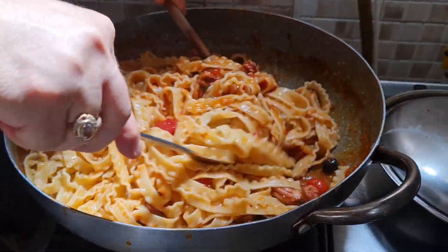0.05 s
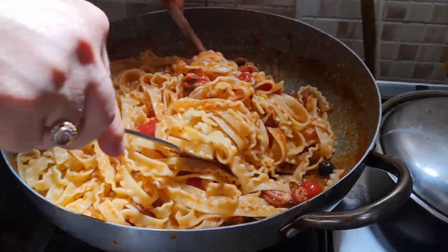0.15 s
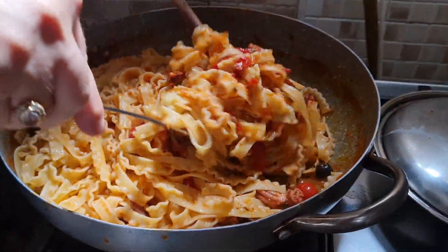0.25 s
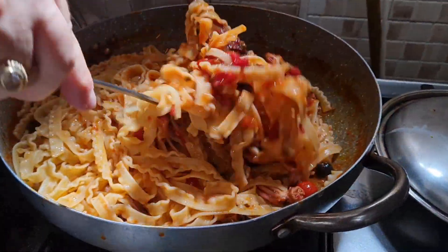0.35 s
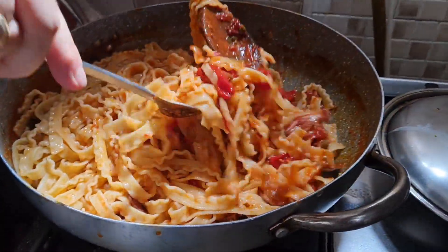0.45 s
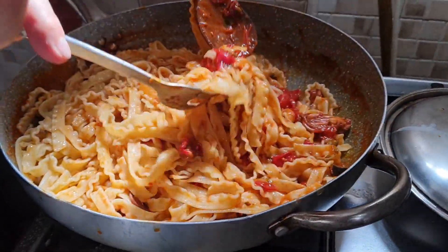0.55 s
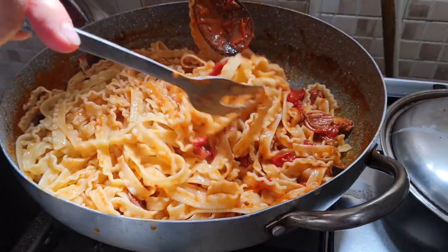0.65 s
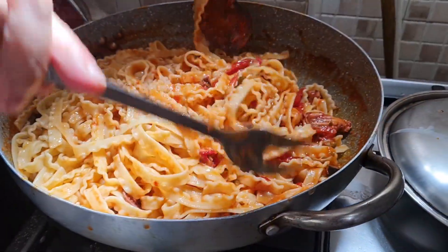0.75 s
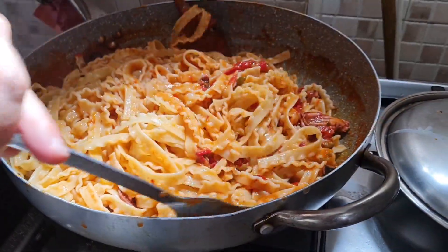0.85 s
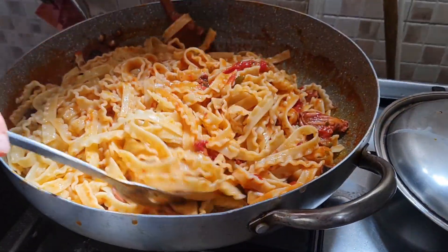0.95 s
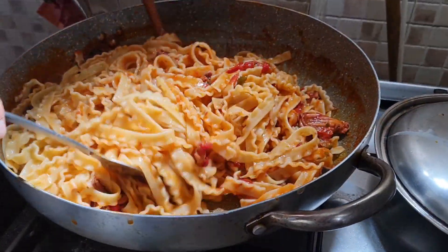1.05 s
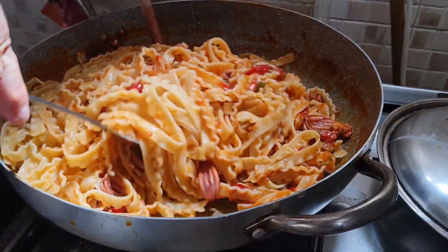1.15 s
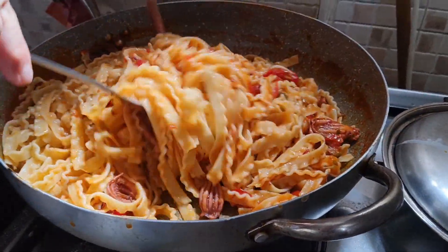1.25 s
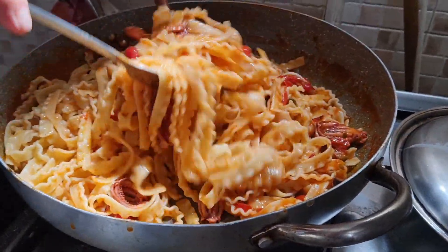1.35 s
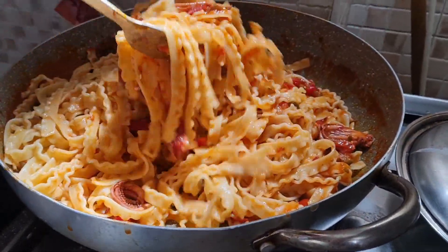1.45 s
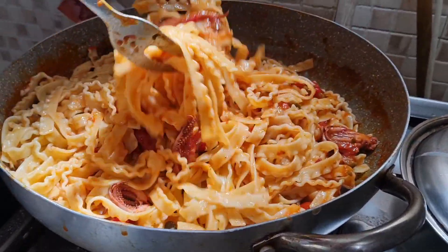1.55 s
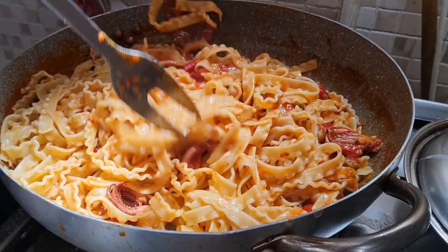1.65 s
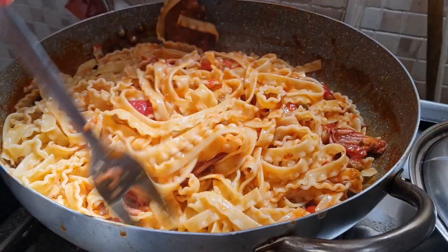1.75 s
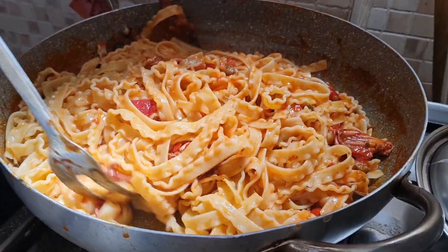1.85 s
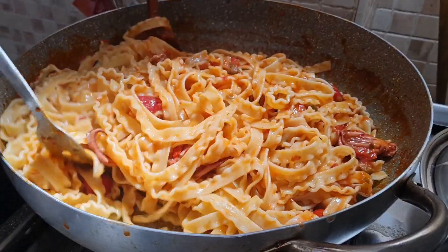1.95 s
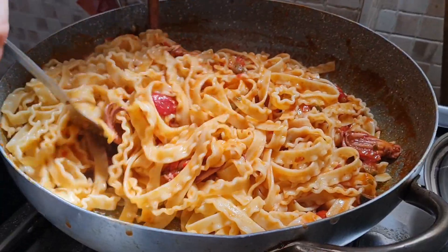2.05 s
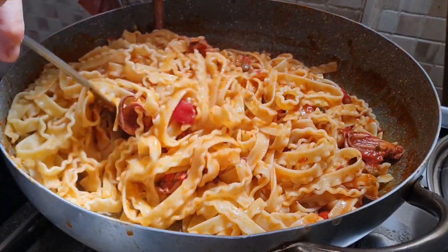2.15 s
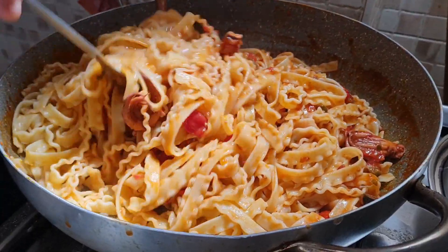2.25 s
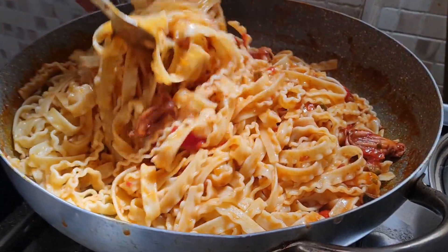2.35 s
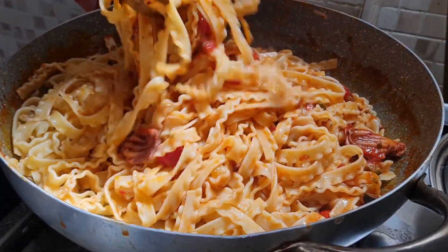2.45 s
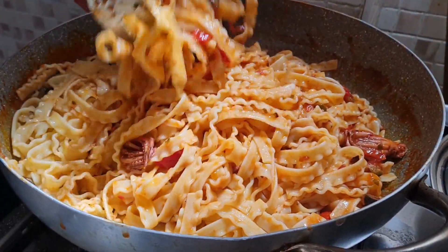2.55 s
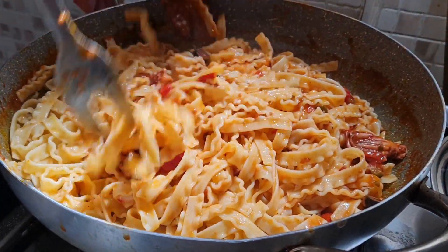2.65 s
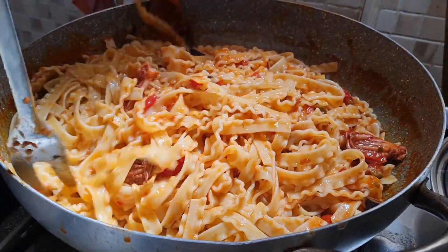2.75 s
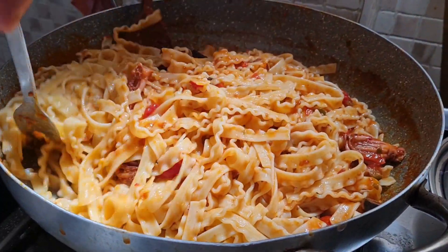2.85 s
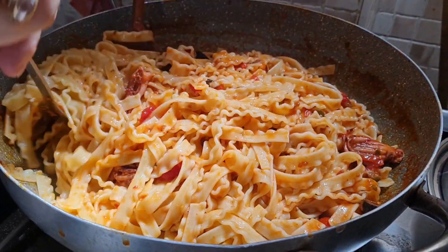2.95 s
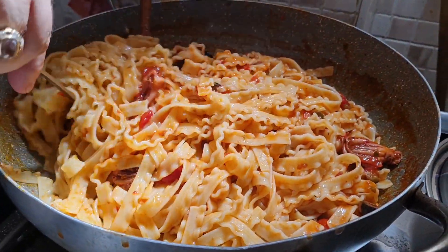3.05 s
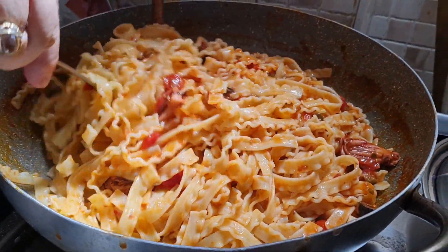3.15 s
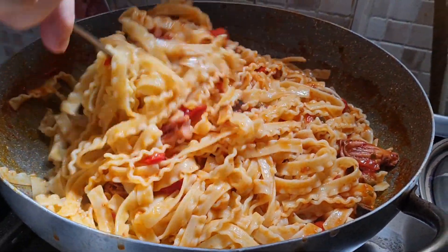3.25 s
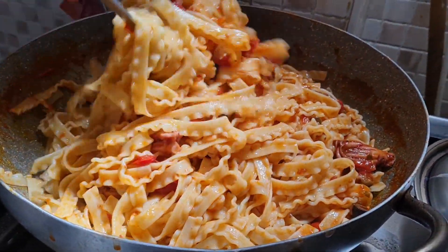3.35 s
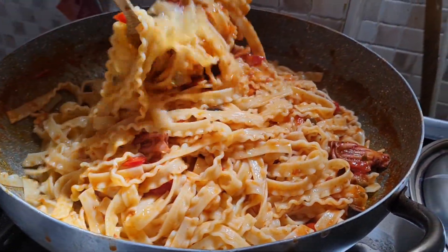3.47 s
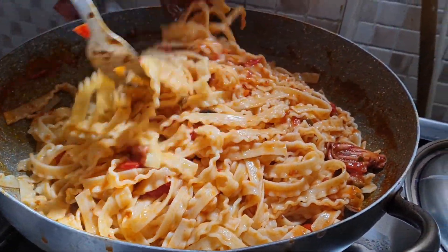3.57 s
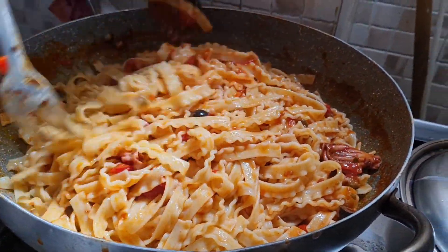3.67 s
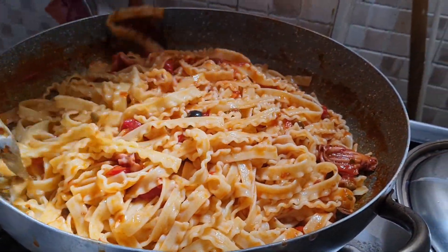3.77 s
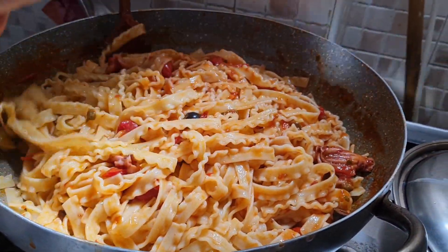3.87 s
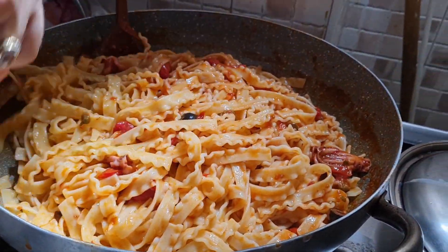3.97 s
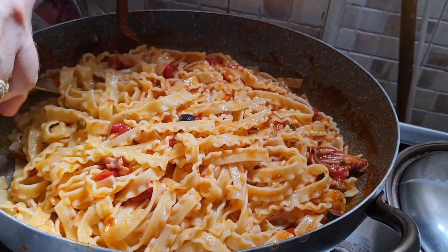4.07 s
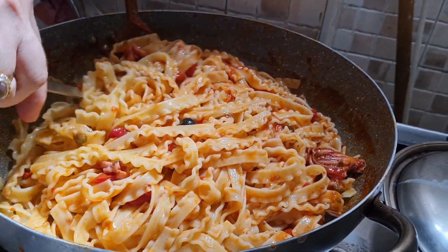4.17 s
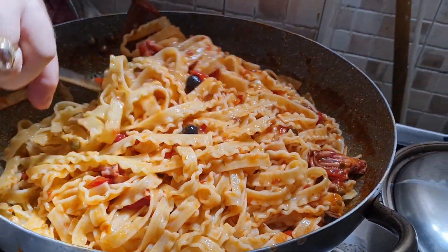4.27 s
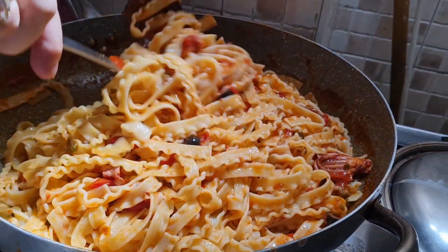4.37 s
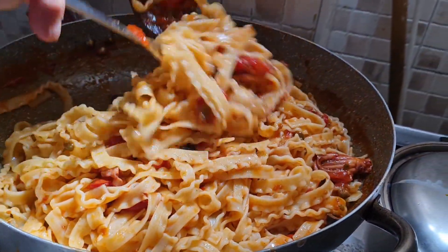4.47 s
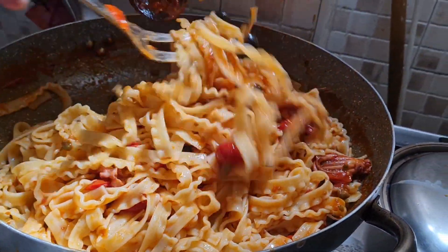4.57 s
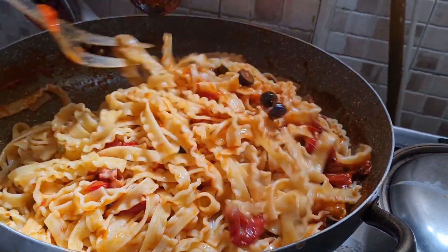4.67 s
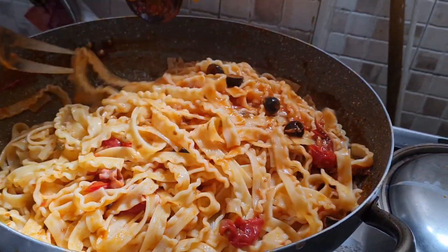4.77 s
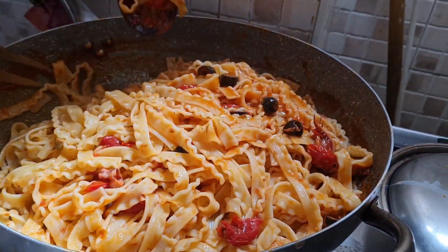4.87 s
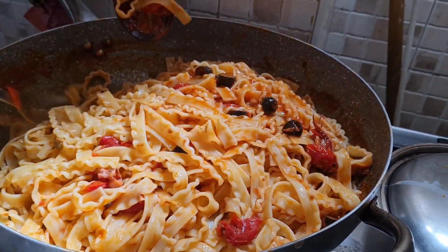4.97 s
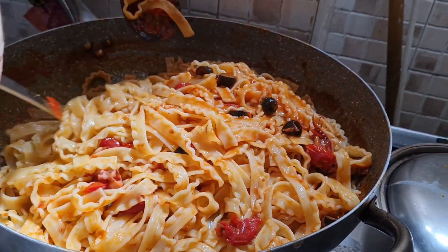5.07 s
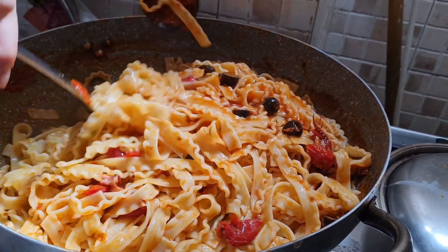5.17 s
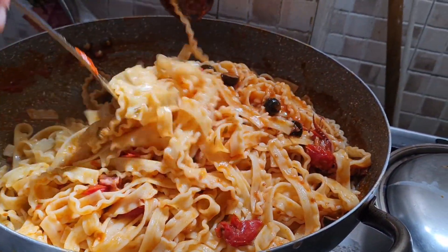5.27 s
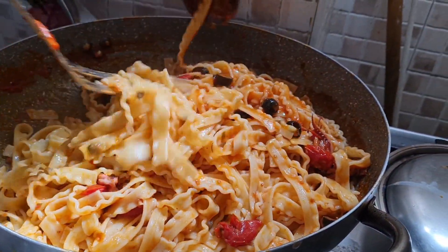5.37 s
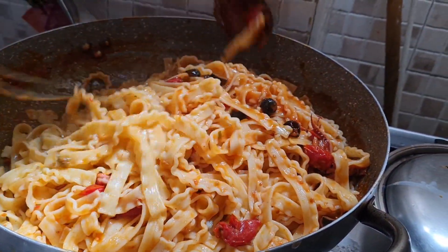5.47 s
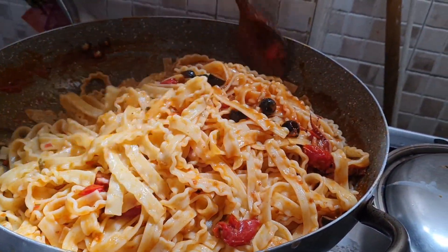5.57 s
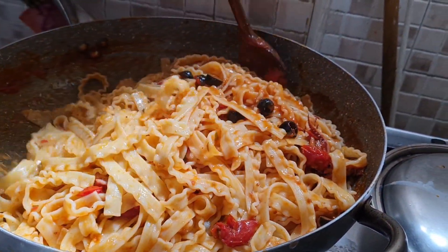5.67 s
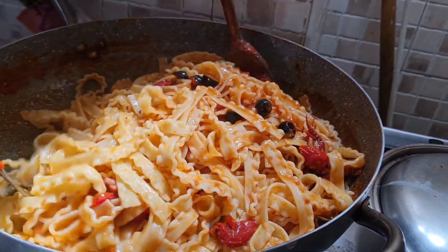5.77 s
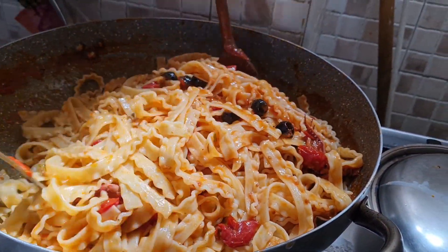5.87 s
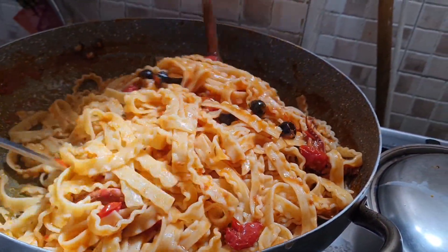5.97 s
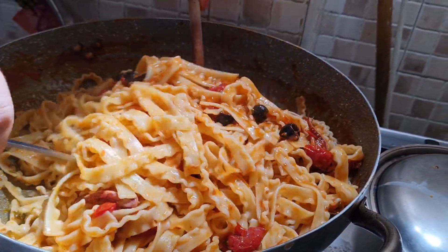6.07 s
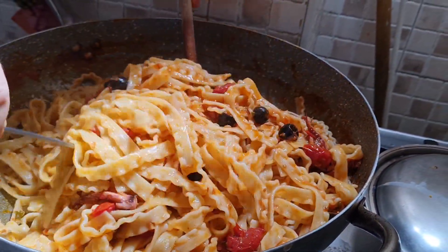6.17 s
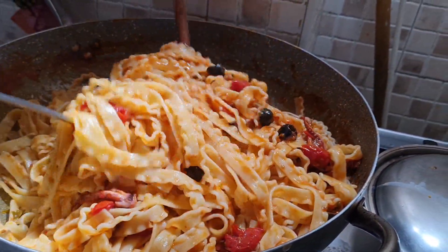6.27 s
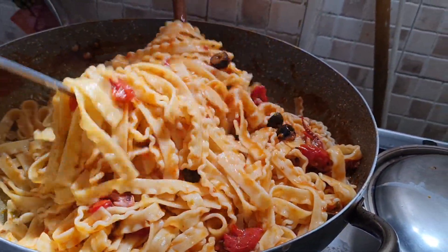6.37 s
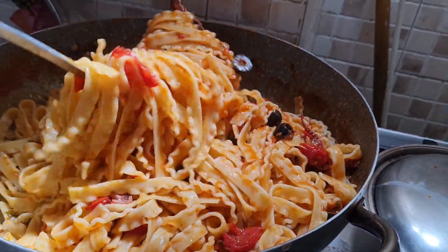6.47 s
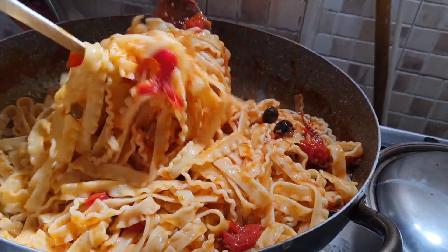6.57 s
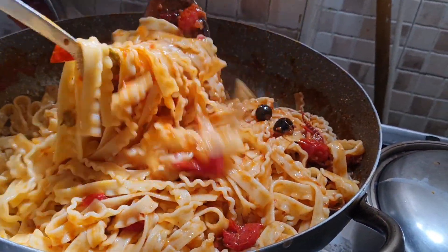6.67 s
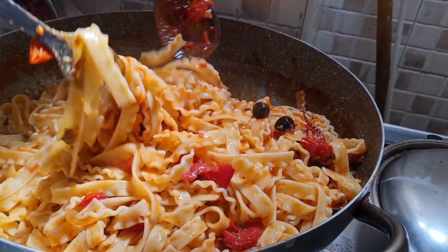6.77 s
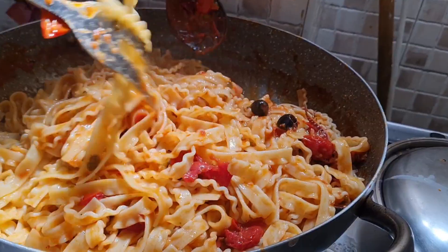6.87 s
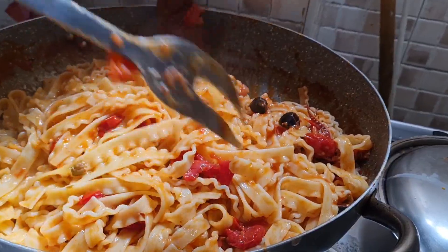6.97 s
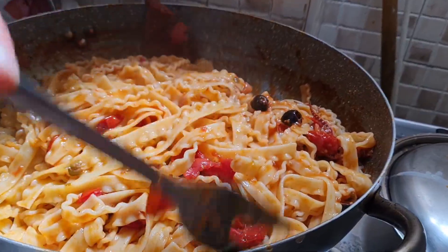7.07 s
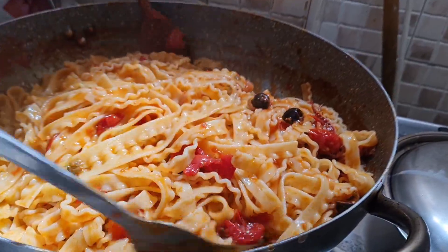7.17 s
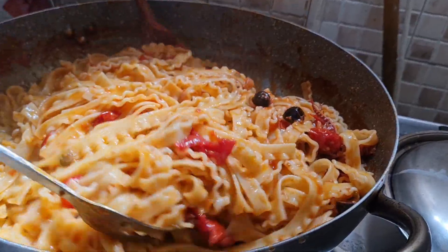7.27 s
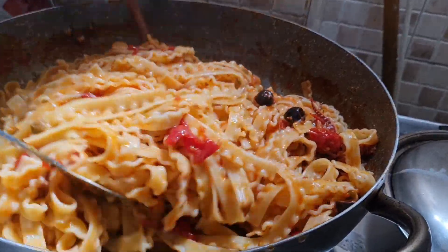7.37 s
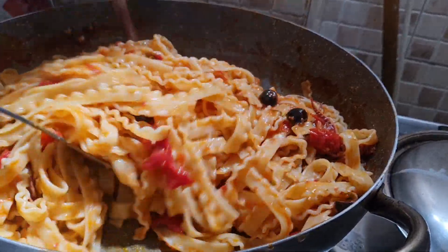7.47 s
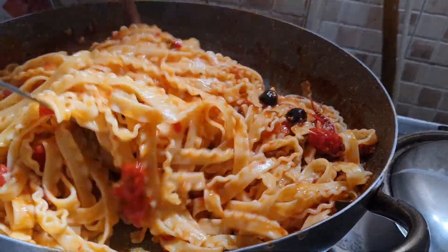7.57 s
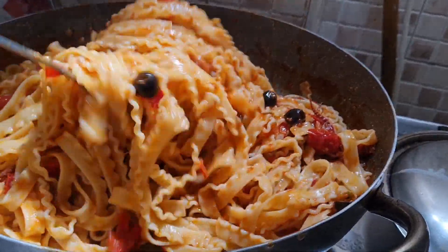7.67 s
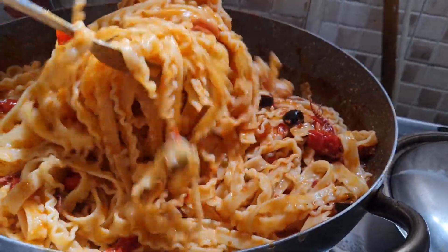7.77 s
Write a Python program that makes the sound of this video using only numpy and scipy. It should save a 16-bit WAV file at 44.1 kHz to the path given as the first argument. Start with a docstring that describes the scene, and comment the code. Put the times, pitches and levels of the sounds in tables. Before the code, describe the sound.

A small tiled kitchen, heard close and in stereo, with a low wavering motor hum, soft room air and faint hiss throughout. At 0 s a brief light fork scrape fades, then wet noodle smacks and small ticks come around 0.5. A double clank of fork on food-damped pan at 0.85 leads to squeaky, gritty drags until 1.15, with a loud wet smack at 1.25. Another clank and rasp fall at 1.8 to 2.1; noodles pop near 2.45. The heaviest, boomiest clank, with grate rattle, hits at 2.78, then scrapes. More clanks come at 3.8, with a longer drag and dull bump near 4.15, at 4.9, with a squeak at 5.05, and doubled at 5.6, with scrapes to 6.1. Mostly soft, sticky noodle sounds follow until a clank at 7.1, short scrapes at 7.2 to 7.45, and clear wet smacks around 7.5 to 7.6.

```python
"""Tossing pasta in a metal pan

A steel fork tosses sauced pasta in a wide pan on a stove in a small kitchen, close to two microphones.
Each plunge clanks: grainy contact noise and damped modes of pan and grate, then squeaks, as swelling tones.
The drags are gritty scrapes: noise through resonances of pan and tines, shaped by the hand's pressure.
Lifted noodles smack softly in clumps of short pops, and pan and falling pasta bump dully.
Behind them a motor hums as wavering low sines, over the soft noise of the room."""
import sys
import numpy as np
from scipy import signal
from scipy.fft import rfft, irfft, next_fast_len
from scipy.io import wavfile
from scipy.ndimage import uniform_filter1d, map_coordinates

SR = 44100
rng = np.random.default_rng(int(sys.argv[2]) if len(sys.argv) > 2 else 0)


def materialize(psi):
    """Save the field psi as 16-bit PCM at rate SR to the path in sys.argv[1].

    A 1-D psi becomes a single channel; in a 2-D psi each row is a channel.
    """
    bounded = np.clip(np.atleast_2d(psi).T, -1, 1)
    quanta = np.round(bounded * 32767).astype(np.int16)
    wavfile.write(sys.argv[1], SR, quanta)


N = 345303


def amp(db):
    """Decibels to gain."""
    return 10 ** (np.asarray(db) / 20)


def unit(x):
    """Scale to rms 1."""
    return x / np.sqrt(np.mean(x ** 2) + 1e-20)


def along(points, hz):
    """Interpolate (f/Hz, value) points on a log frequency axis."""
    f, v = np.transpose(points)
    return np.interp(np.log(hz + 1), np.log(f + 1), v)


def clock():
    """Time of every sample, in seconds."""
    return np.arange(N) / SR


def over_time(points):
    """Interpolate (t/s, level/dB) points over the whole scene."""
    return np.interp(clock(), *np.transpose(points))


def wobble(rate, size=N):
    """A smooth random curve with rate knots a second."""
    knots = rng.standard_normal(int(size * rate / SR) + 4)
    coarse = np.arange(0, size + 32, 32)
    curve = map_coordinates(knots, [coarse * rate / SR], mode="nearest")
    return np.interp(np.arange(size), coarse, curve)


def filtered(x, response):
    """Apply a response of frequency to x."""
    m = next_fast_len(N + 8192, True)
    return irfft(rfft(x, m) * response(np.fft.rfftfreq(m, 1 / SR)), m)[..., :N]


def add(track, s, sound):
    """Mix a sound into a track at time s."""
    part = track[:, max(round(s * SR), 0):][:, :sound.shape[-1]]
    part += sound[..., :part.shape[1]]


def colour(points):
    """Response of a (f/Hz, level/dB) spectrum."""
    return lambda hz: amp(along(points, hz))


def resonant(modes):
    """Response of (f/Hz, nominal width/Hz, level/dB) resonances, summed."""
    return lambda hz: sum(amp(db) / (1 + ((hz - f) / (0.36 * width)) ** 2) ** 0.56
                          for f, width, db in modes)


LAG_S = 0.0003675  # the pan reaches the right port this much late


def at_ports(t):
    """Time as each microphone port hears it: the right one is late."""
    return t - np.arange(2)[:, None] * LAG_S


# likeness of the two microphone ports: f/Hz, likeness (0-1)
PORT_LIKENESS = [(100, 0.93), (400, 0.33), (1400, 0.59), (2500, 0.21), (6000, 0.027)]


def noise(response, spiky_db=0):
    """Stereo noise of rms 1, late on the right and less alike in the treble; spiky makes it grainy."""
    m = next_fast_len(N, True)
    hz = np.fft.rfftfreq(m, 1 / SR)
    grains = rng.standard_normal((2, N)) * amp(spiky_db * wobble(700))
    shared, own = rfft(grains, m) * response(hz)
    alike = np.clip(along(PORT_LIKENESS, hz), 0, 1)
    late = np.exp(-2j * np.pi * hz * LAG_S)
    right = shared * alike * late + own * np.sqrt(1 - alike ** 2)
    return unit(irfft(np.array([shared, right]), m)[:, :N])


def patches(x, depth_db):
    """Narrow bands come and go; each moment keeps its total over frequency, in each port."""
    z = signal.stft(x, nperseg=1024)[2]
    field = rng.standard_normal(z.shape[1:]) + .5 * rng.standard_normal(z.shape)
    field = uniform_filter1d(field, size=3, axis=1)
    field = uniform_filter1d(field, size=10, axis=2)
    banded = z * amp(depth_db * unit(field))
    before = np.linalg.norm(z, axis=1, keepdims=True)
    banded *= before / (np.linalg.norm(banded, axis=1, keepdims=True) + 1e-20)
    return signal.istft(banded, nperseg=1024)[1][:, :N]


# motor's drone: t/s, level/dB
DRONE_LEVEL = [(0.0, -46), (1.2, -43), (3.49, -42), (3.6, -34), (3.84, -48), (3.9, -38.5), (4.27, -41.5),
               (4.62, -36), (4.73, -53), (4.8, -40.5), (5.37, -39), (5.47, -52), (5.56, -38.5), (6.02, -46),
               (7.54, -40), (7.59, -44), (7.68, -36), (7.83, -46)]
DRONE_HZ, WAVER_DB, WAVER_RATE = 59.8, 1.8, 14  # pitch; depth and knots a second of its wavering
# partials of the motor's hum: f/Hz, level/dB
HUM_PARTIALS = [(118.4, -59), (177.6, -65.5), (253, -66.5), (290.7, -65.5), (376.8, -68)]


def motor():
    """A motor hums unsteadily: sines whose level and phase wander."""
    t = clock()
    level = amp(over_time(DRONE_LEVEL) + WAVER_DB * wobble(WAVER_RATE))
    hum = level * np.sin(2 * np.pi * DRONE_HZ * t + 0.31 * wobble(8.3))
    for hz, db in HUM_PARTIALS:
        hum += amp(db + 2.56 * wobble(4)) * np.sin(2 * np.pi * hz * t + .5 * wobble(3.7))
    return np.sqrt(2) * hum


# soft rush of the room's air: f/Hz, relative level/dB
ROOM_COLOUR = [(20, -14), (45, 9.5), (100, 5.5), (150, -10), (200, 0), (260, -2), (330, -8), (600, -4.5),
               (1000, -7.5), (1500, -13), (2500, -18), (6000, -26.5), (13000, -25.5)]
# faint treble between strokes, the base level for hiss and noodles: t/s, level/dB
TREBLE_LEVEL = [(0.0, -67), (.33, -59), (.55, -67), (.8, -55), (1.7, -56), (4.6, -56), (6.2, -58.5),
                (7.83, -56)]
# colour of the hiss: f/Hz, relative level/dB
HISS_COLOUR = [(5000, -30), (8500, -1), (10500, -1), (11700, 3), (12400, 0), (14500, 2), (16000, -2.5)]
# steady narrow bands in the hiss: f/Hz, nominal width/Hz, relative level/dB
WHINE_BANDS = [(5430, 200, -4), (11720, 200, 1.5)]
HISS_DB, WHINE_DB = 4, -64  # hiss over the treble level; whine


def room():
    """The room's soft rush, a patchy hiss and faint narrow bands, all of filtered noise."""
    rush = amp(-48.0 + 0.9 * wobble(7.3)) * noise(colour(ROOM_COLOUR))
    hiss = amp(over_time(TREBLE_LEVEL) + HISS_DB) * patches(noise(colour(HISS_COLOUR)), depth_db=2.5)
    whine = amp(WHINE_DB) * noise(resonant(WHINE_BANDS))
    return rush + hiss + whine


def slips(rate):
    """Stick and slip: the friction flutters finely as the tines catch and let go."""
    return unit(amp(1.2 * wobble(rate) + .8 * wobble(40)))


def rasp(response):
    """Grainy noise in patches: the wandering contact point favours ever new modes."""
    return patches(noise(response, spiky_db=2.6), depth_db=4.8)


# fork drags over the pan: start t/s, length/s, base level/dB, wall level/dB, tine level/dB,
# grit level/dB, push/dB (before each part's share), place of the push (0-1 of the length)
FORK_DRAGS = [(0.0, 0.059, -52.5, -40.5, -47.5, -39, 0, 0.4),
              (0.909, 0.1, -49, -37, -38.5, -42, 12.5, 0.78),
              (1.029, 0.11, -48, -39.5, -44.5, -46.5, 5.5, 0.66),
              (1.83, 0.091, -41, -30.5, -35.5, -38.5, -1, 0.64),
              (1.941, 0.13, -44, -35.5, -41, -42, 5, 0.6), (2.799, 0.076, -43, -38, -31, -29.5, -1.5, .6),
              (2.922, 0.015, -48.5, -52, -40.5, -35.5, 8, .4),
              (2.955, 0.13, -50.5, -48.5, -44, -43.5, 5, 0.92),
              (3.817, 0.29, -44, -42.5, -37.5, -32, 6, 0.99),
              (4.408, 0.054, -54.5, -51, -55.5, -47, 1, 0.3),
              (4.929, .15, -46.5, -39, -38.5, -36.5, 9, 0.85),
              (5.626, 0.098, -40, -43, -45, -39.5, 10, 0.92), (5.803, 0.037, -45.5, -50, -49.5, -50, 3, .2),
              (5.885, 0.2, -43, -44, -49, -46.5, 11, 0.51), (7.216, 0.037, -39, -40, -39, -42, 3, .5),
              (7.263, 0.077, -47, -38.5, -48, -49, 7, 0.34),
              (7.358, 0.076, -49.5, -38.5, -42.5, -44, 2.5, 0.84)]
# resonances of base, wall and tines with the fork pressed on the pan, and the broad response
# of the food-damped wall: f/Hz, nominal width/Hz, relative level/dB
BASE_MODES = [(616, 50, 6), (633, 250, 6)]
WALL_MODES = [(1076, 28, 1), (1264, 43, 1), (1485, 47, 8.5), (1962, 210, 2), (2180, 140, -26),
              (2390, 230, 4.5)]
TINE_MODES = [(3220, 144, 1.5), (3660, 99, -12), (3890, 260, -1), (4580, 920, -13.5), (5400, 190, -7),
              (6300, 300, -33)]
WALL_BROAD = [(1150, 350, -22), (2700, 850, -16)]
# grit of the contact: f/Hz, relative level/dB
GRIT_COLOUR = [(4000, -36), (6500, 5.5), (9000, 0), (11500, -3.5), (14000, -4), (16000, -3.5)]
# as the fork slides on: level slope of base, wall, tines, grit [dB/s]
SLIDE_SLOPE = (-28, 4, 1, -19)
# how much base, wall, tines, grit feel the push: share (0-1)
PUSH_FELT = (0.088, 0.77, 0.68, 0.28)
BITE_S, LET_GO_S = 0.013, 0.016  # the tines take hold before the start; they leave the metal
PUSH_WIDTH_S = 0.024  # the hand bears down briefly once in each drag
PRESSURE_DB, PRESSURE_RATE = 1.6, 28  # unsteady hand: depth, knots a second


def scrapes():
    """Tiny slips drive base, wall, tines and grit; each drag bites, swells under one push and lets go."""
    t, drive = clock(), np.zeros((4, N))
    for start, length, *levels_db, push_db, place in FORK_DRAGS:
        near = (t > start - .05) & (t < start + length + .2)
        age = t[near] - start
        touching = np.clip(age / BITE_S + 1, 0, 1)
        touching *= np.exp(-np.maximum(age - length, 0) / LET_GO_S)
        push = push_db * np.exp(-((age - place * length) / PUSH_WIDTH_S) ** 2)
        for part, db, slope, share in zip(drive, levels_db, SLIDE_SLOPE, PUSH_FELT):
            part[near] += touching * amp(db + slope * (age - length / 2) + share * push)
    base = noise(resonant(BASE_MODES))
    wall = rasp(resonant(WALL_MODES + WALL_BROAD))
    tines = rasp(resonant(TINE_MODES))
    grit = rasp(colour(GRIT_COLOUR))
    pressure = amp(PRESSURE_DB * wobble(PRESSURE_RATE))
    scraped = sum(d * part for d, part in zip(drive, (base, wall, tines, grit)))
    return slips(rate=450) * pressure * scraped


# wet smacks of the noodles: t/s, level/dB, f/Hz
NOODLE_SMACKS = [(0.0598, -36, 2130), (0.486, -29.5, 4170), (0.53, -44, 3500), (1.2526, -27.5, 1580),
                 (1.504, -39, 3480), (2.393, -42.5, 3120), (2.4686, -31.5, 2010), (2.6375, -40, 3540),
                 (3.4004, -46, 3400), (6.3066, -46, 2540), (6.6029, -45, 2740), (6.6957, -43, 3400),
                 (7.069, -37.5, 3340), (7.4994, -29, 1210), (7.5348, -29.5, 1390), (7.5903, -32.5, 1240)]
# crisp little ticks: t/s, level/dB
CRISP_TICKS = [(.169, -37), (.51, -44), (4.404, -38)]
# the fork lifts a load of noodles: t/s
NOODLE_LIFTS = [.6, 1.35, 2.4, 3.449, 4.5, 5.3, 6.5, 7.65]
# colour of the wet rustle: f/Hz, relative level/dB
WET_COLOUR = [(1200, -57), (2500, -5), (3300, 1), (4400, -2), (5600, 2), (6600, 3), (9000, -18)]
LIFT_SPREAD_S, FAINT_DB, FAINT_HZ = .19, -56.5, 2130  # faint smacks: spread, least level, lowest pitch
RUSTLE_DB = 1.0  # wet noodles over the treble level


def pasta():
    """Sauce films snap between noodles: clear smacks and ticks over many faint ones and a wet rustle."""
    out, t = np.zeros((2, N)), np.arange(int(0.034 * SR)) / SR
    smacks = list(NOODLE_SMACKS)
    for lift in NOODLE_LIFTS:
        for size, pitch in rng.uniform(1e-6, 1, size=(14, 2)):
            s = lift + LIFT_SPREAD_S * rng.normal()
            smacks.append((s, FAINT_DB + 3 * min(-np.log(size), 3), FAINT_HZ * 2.2 ** pitch))
    for s, db, hz in smacks:
        # a film tears in a quick clump of ever weaker pops of scattered pitch
        for k in range(4):
            delay = k * rng.uniform(.001, .003)
            pitch = hz * np.exp(rng.normal(0, .02 + .045 * k))
            envelope = (1 - np.exp(-t / 0.00058)) * amp(-60 * t / 0.012)
            pop = envelope * np.sin(2 * np.pi * pitch * at_ports(t))
            add(out, s + delay, amp(db + 7.5 - 6.9 * k) * pop)
        add(out, s, amp(db - 16 - 60 * t / 0.033) * rng.standard_normal((2, len(t))))
    for s, db in CRISP_TICKS:
        add(out, s, amp(db - 60 * t / 0.03) * rng.standard_normal((2, len(t))))
    sticky = patches(noise(colour(WET_COLOUR), spiky_db=3), depth_db=2.5) * amp(wobble(25))
    return out + amp(over_time(TREBLE_LEVEL) + RUSTLE_DB) * sticky


def swells(rows, rough, flutter_rate):
    """Short swelling tones whose phase is shaken by uneven contact (rough in radians)."""
    out = np.zeros((2, N))
    for s, half, hz, db in rows:
        t = np.arange(-3 * half, 3 * half, 1 / SR)
        phase = 2 * np.pi * hz * at_ports(t) + rough * wobble(flutter_rate, size=len(t))
        add(out, s - 3 * half, amp(db) * np.sqrt(2) * np.exp(-(t / half) ** 2) * np.sin(phase))
    return out


# dull bumps of pan and falling pasta: middle t/s, half length/s, f/Hz, level/dB
DULL_BUMPS = [(.245, 0.034, 123, -46), (.25, 0.034, 245, -47), (1.97, 0.071, 82.4, -41.5),
              (2.97, 0.043, 93.5, -36), (3.93, 0.153, 97.7, -38.5), (4.158, 0.0092, 63.6, -26.5),
              (4.21, 0.0544, 41.4, -38), (7.39, 0.033, 97, -50), (7.6, 0.0073, 294, -44.5)]


def bumps():
    """Pan and falling pasta bump dully: low tones with a slowly shaken phase."""
    return swells(DULL_BUMPS, rough=0.58, flutter_rate=38.4)


def ring(modes, t, attack):
    """Damped modes at fresh strengths; high modes reach the two ports in unrelated phase."""
    out = np.zeros((2, len(t)))
    for k, (hz, db, t60) in enumerate(modes):
        phase = k * np.pi + rng.normal(0, 1, (2, 1)) * min((hz / 2200) ** 2, 2)
        strength_db = db + rng.normal(0, 1.5)
        out += amp(strength_db - 60 * t / t60) * np.sin(2 * np.pi * hz * at_ports(t) + phase)
    return out * (1 - np.exp(-t / attack))


# fork hits the pan: t/s, clash level/dB, base level/dB, wall level/dB, zing level/dB, grit level/dB,
# rock level/dB, grate level/dB, chatter/s
FORK_STRIKES = [(0.841, -19.5, -8, -24, -24.5, -19.5, -45.5, -40.5, 0.022),
                (0.8774, -23, -18, -27.5, -25, -28, -39, -52, 0.011),
                (1.8126, -23.5, -15, -42, -29.5, -12, -36, -39.5, 0.0063),
                (2.761, -34.5, -13, -26.5, -44.5, -41, -31, -46, 0.01),
                (2.777, -21.5, 1.5, -21.5, -24.5, -21.5, -24.5, -25.5, 0.011),
                (3.7938, -17, -4, -22, -19.5, -20, -37, -26.5, 0.0098),
                (4.896, -17.5, -7.5, -32, -16.5, -13, -37.5, -38.5, 0.0097),
                (4.922, -34.5, -29, -31, -42, -24.5, -30.5, -37.5, 0.011),
                (5.5922, -20.5, -8, -22.5, -22.5, -20, -44, -36, 0.0096),
                (5.6088, -23.5, -21, -36, -31, -24, -29, -33.5, 0.0072),
                (7.124, -19, -8.5, -21, -21.5, -22.5, -35, -35, 0.016)]
# contact noises, and the thud of the grate: f/Hz, relative level/dB
CLANK_COLOUR = [(350, -27), (700, -3), (1300, -6), (1600, -2), (2200, -44)]
CLASH_COLOUR = [(900, -32), (1700, -5), (2400, -9.5), (3400, -1.5), (4100, -5), (5200, -42)]
ZING_COLOUR = [(3600, -22), (4600, 2.5), (5600, -0.5), (6500, -2), (7500, -18), (9500, -16)]
THUD_COLOUR = [(90, -26), (150, -5.5), (220, 2.5), (380, -4), (480, -12), (700, -45)]
# modes of the food-damped base, of pan and fork, of the rocking pan and of the pan on its grate:
# f/Hz, relative level/dB, t60/s
BASE_BOOM = [(585.6, 2, 0.058), (629, -8, 0.053), (781, -11, 0.071)]
PAN_RING = [(893, 0, 0.17), (1026, 4, 0.067), (1174, 12.5, 0.04), (1351, 0, 0.18), (1477, 2, 0.1),
            (1968, 2, 0.21), (2090, 2.5, 0.093), (2602, 8, 0.1), (3000, -17, .06), (3340, -18, 0.1),
            (3740, -18.5, .05), (3560, -28, .06), (3700, -11, 0.083), (4400, -16, .04), (5630, 8, 0.058),
            (5410, -16, .05), (5340, -11, 0.038), (5900, -5, .05)]
PAN_ROCK = [(100.6, -0.78, 0.41), (112, -0.49, 0.19)]
GRATE_RING = [(179, -22, 0.26), (222, -7, 0.25), (255.6, -6, 0.25), (287, 0.5, 0.43), (349, 2, 0.09),
              (386.7, 2, 0.29)]
WALL_RING_DB, TINE_RING_DB = -3, -11  # ringing of low and high modes against the contact noise
CONTACT_LEAD_S = 0.0019  # the contact begins this long before it is felt in full


def chatter_noise(points):
    """Grainy, patchy noise of tines chattering on metal."""
    return patches(noise(colour(points), spiky_db=1.5), depth_db=4)


def strikes():
    """The tines chatter on the metal for some milliseconds; base, wall and grate ring on."""
    out, t = np.zeros((2, N)), np.arange(SR // 3) / SR
    clank, clash = chatter_noise(CLANK_COLOUR), chatter_noise(CLASH_COLOUR)
    zing, grit = chatter_noise(ZING_COLOUR), chatter_noise(GRIT_COLOUR)
    thud = noise(colour(THUD_COLOUR))
    low_modes = [mode for mode in PAN_RING if mode[0] < 1700]
    high_modes = [mode for mode in PAN_RING if mode[0] >= 1700]
    for s, clash_db, base_db, wall_db, zing_db, grit_db, rock_db, grate_db, chatter in FORK_STRIKES:
        start = s - CONTACT_LEAD_S
        now = slice(round(start * SR), round(start * SR) + len(t))
        # the pasta cushions the blow, so the contact builds up before it fades
        build = 1 - np.exp(-(t / 0.0026) ** 2)
        contact = build * (np.exp(-(t / chatter) ** 2) + amp(-7 - 60 * t / 0.16))
        metal = amp(wall_db) * clank[:, now] + amp(clash_db) * clash[:, now]
        metal += amp(zing_db) * zing[:, now] + amp(grit_db) * grit[:, now]
        add(out, start, contact * metal)
        # the base is a little stronger at the right port
        blow = amp(base_db + np.array([[-1.5], [1.5]])) * ring(BASE_BOOM, t, attack=0.007)
        blow += amp(wall_db + WALL_RING_DB) * ring(low_modes, t, attack=0.0014)
        blow += amp(clash_db + TINE_RING_DB) * ring(high_modes, t, attack=0.0049)
        # the pan rocks, and the grate below it rattles with a slower onset
        blow += amp(rock_db) * ring(PAN_ROCK, t, attack=0.0042)
        blow += amp(grate_db) * ring(GRATE_RING, t, attack=0.018)
        blow += amp(grate_db - 60 * t / 0.3) * (1 - np.exp(-t / 0.014)) * thud[:, now]
        add(out, s, blow)
    return out


# a tine catches and squeaks: middle t/s, half length/s, f/Hz, level/dB
TINE_SQUEAKS = [(.848, 0.0033, 3400, -18), (.975, 0.012, 1700, -25), (.985, 0.017, 2334, -34),
                (1.818, 0.0057, 3304, -20), (1.889, 0.0077, 3280, -31), (1.908, 0.012, 1990, -26.5),
                (2.02, .008, 1533, -24), (2.05, 0.0089, 3220, -33), (2.842, 0.013, 3360, -29.5),
                (3.73, 0.017, 3330, -50), (4.105, 0.0183, 5330, -35.5), (5.052, 0.023, 1999, -27.5),
                (5.06, 0.023, 4060, -42), (7.375, 0.022, 3330, -41.5), (7.415, .012, 3150, -35),
                (7.415, 0.0093, 2420, -36)]


def squeaks():
    """A catching tine squeaks: brief high tones roughened by a fast phase flutter."""
    return swells(TINE_SQUEAKS, rough=0.85, flutter_rate=334)


# decay of the kitchen: f/Hz, t60/s
KITCHEN_DECAY = [(150, 0.41), (600, 0.23), (3000, 0.25), (12000, 0.18)]


def kitchen(x):
    """Tiled walls answer 4 ms later with a short decaying noise tail, different at each port."""
    hz, t, z = signal.stft(rng.standard_normal((2, SR // 2)), SR, nperseg=256)
    decay = amp(-60 * t / along(KITCHEN_DECAY, hz)[:, None])
    tail = signal.istft(z * decay, SR, nperseg=256)[1]
    tail = unit(tail) / np.sqrt(tail.shape[1])
    tail = np.pad(tail, ((0, 0), (round(.004 * SR), 0)))
    return signal.fftconvolve(x, tail, axes=1)[:, :N]


def scene():
    """Fork, pan and pasta close by, with the answer of the kitchen, its motor and its air."""
    close = scrapes() + pasta() + strikes() + squeaks()
    return motor() + room() + close + bumps() + amp(-9.5) * kitchen(close)


# colour of the left and right microphone ports: f/Hz, level/dB
LEFT_PORT = [(60, -1.5), (280, 0.7), (600, -2), (1400, -.5), (3500, -1), (5200, -4), (6300, -2),
             (7300, -12), (8100, -5), (8900, 3), (10500, 1.2), (15000, -2)]
RIGHT_PORT = [(60, 1.5), (280, 1.5), (600, -1.5), (1400, -1), (3500, 0.5), (5500, 2.5), (6500, -5.5),
              (7300, -12), (8300, -7), (10000, -2), (13000, 2.5), (15000, 1.5)]
TOP_HZ = 15950  # band limit


def record(dry):
    """Each port has its own colour, with a notch in the treble; nothing passes the band limit."""
    return filtered(dry, lambda hz: amp([along(LEFT_PORT, hz), along(RIGHT_PORT, hz)]) * (hz < TOP_HZ))


dry = scene()
out = record(dry)
materialize(out)
```